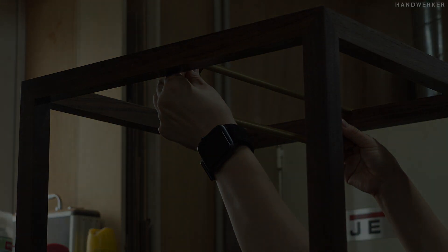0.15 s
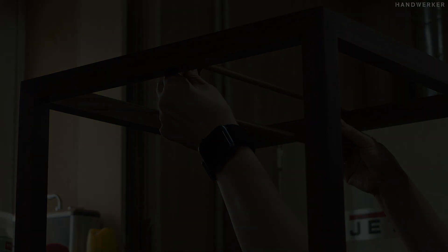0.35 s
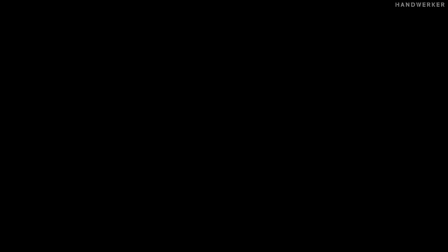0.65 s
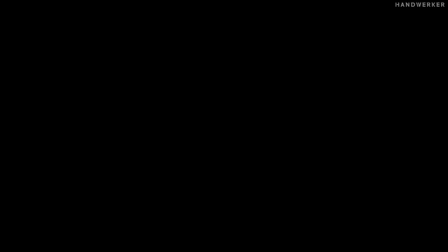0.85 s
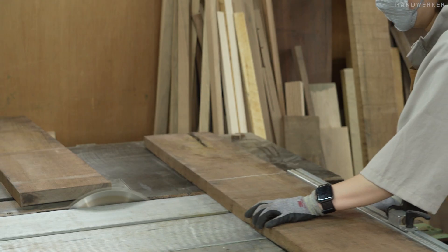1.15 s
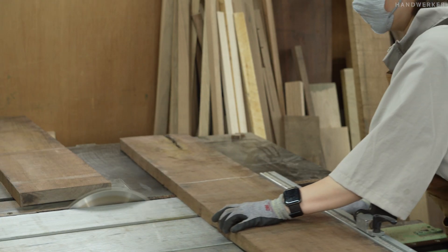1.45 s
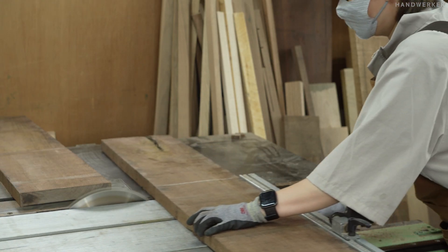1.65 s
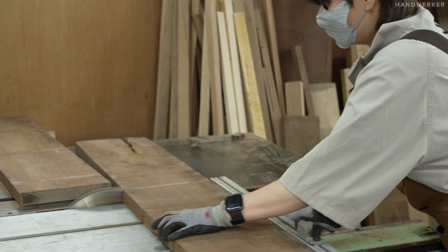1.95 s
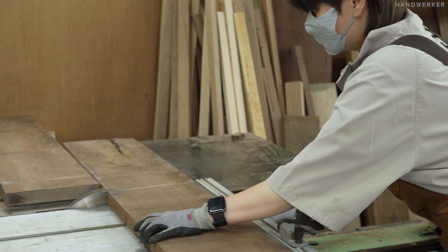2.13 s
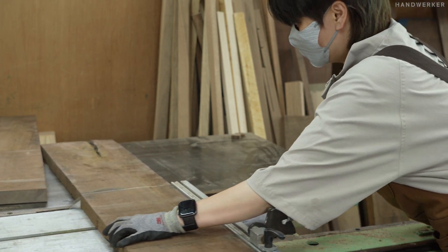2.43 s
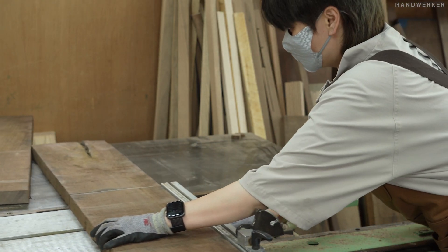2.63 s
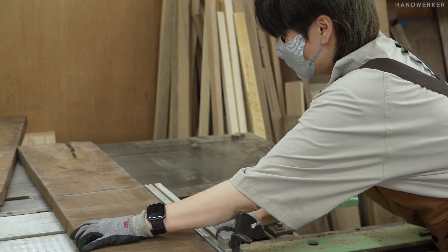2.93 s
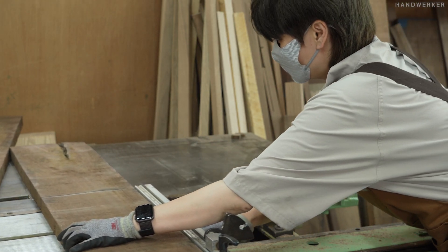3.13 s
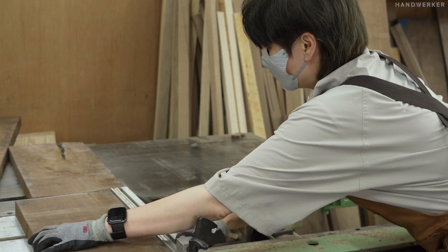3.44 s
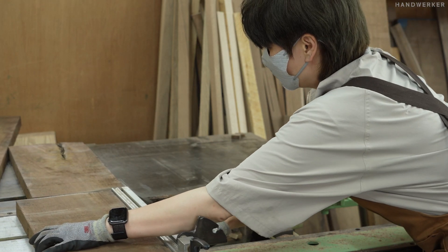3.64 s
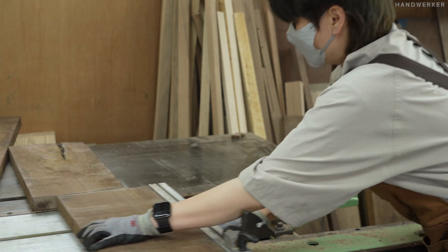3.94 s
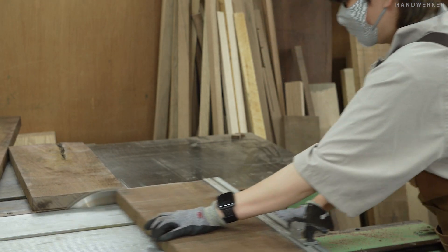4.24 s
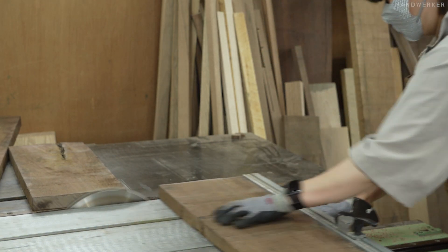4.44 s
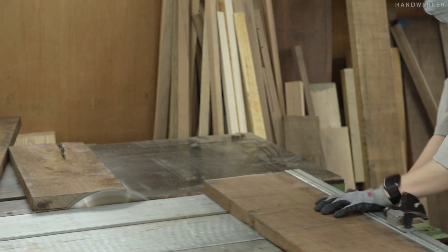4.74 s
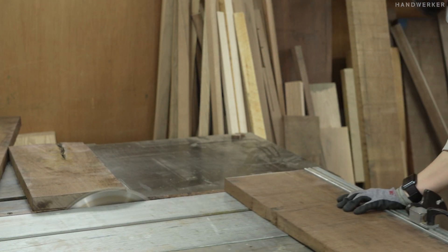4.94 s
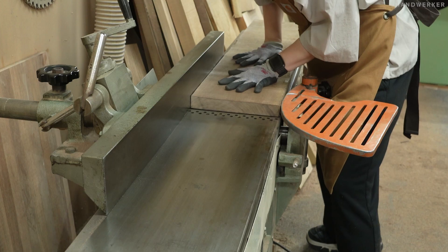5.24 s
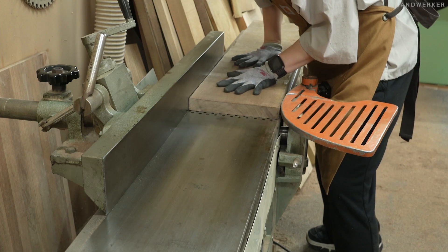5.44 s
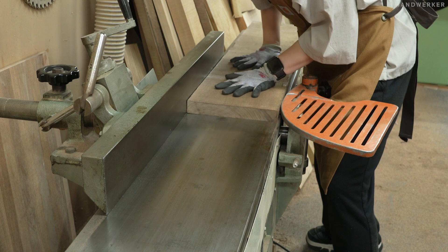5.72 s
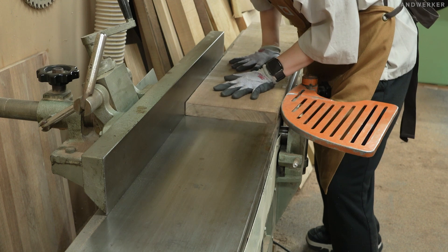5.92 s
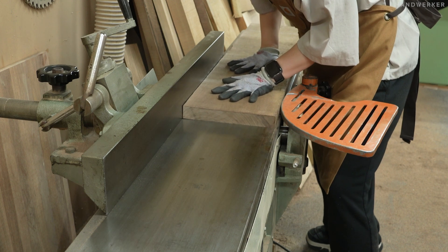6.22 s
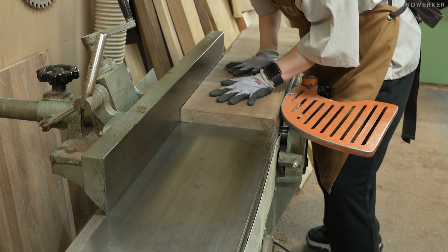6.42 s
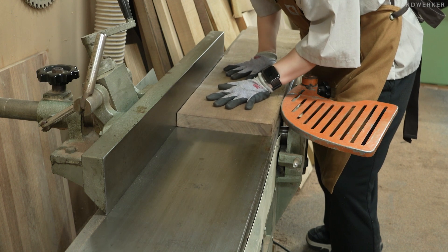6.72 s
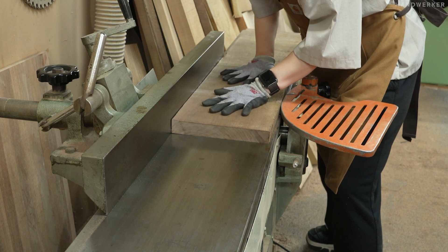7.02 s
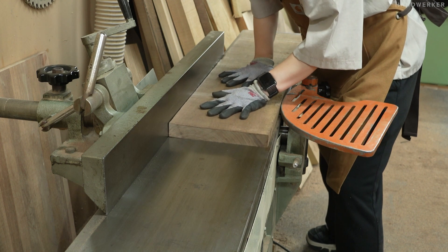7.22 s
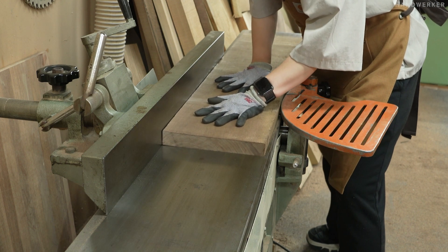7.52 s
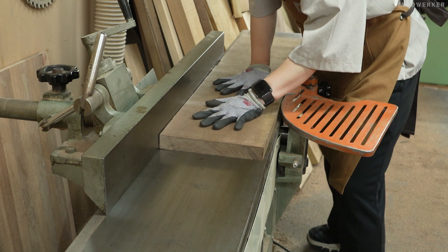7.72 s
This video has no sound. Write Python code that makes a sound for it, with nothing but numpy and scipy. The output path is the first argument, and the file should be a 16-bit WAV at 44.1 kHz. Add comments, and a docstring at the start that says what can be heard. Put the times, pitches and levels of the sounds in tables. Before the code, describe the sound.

A faint room hum with a soft wooden triple knock fades to silence, then a table saw hisses and squeals, then a jointer roars planing a board.

```python
"""A jointer planes a board in a wood shop: knives chop each turn, slot tones hoot and scream, board thuds.
Before it, a table saw hisses with noise and motor harmonics; its blade sings in two wavering tones.
First of all, a quiet room of hum and colored noise fades away from the start, with a soft triple knock
of decaying modes early on. The three moments follow in turn, in mono.
Chops are stroke waveforms that repeat per turn and slowly renew."""
import sys
import numpy as np
from scipy import signal
from scipy.fft import rfft, irfft, next_fast_len
from scipy.io import wavfile
from scipy.ndimage import uniform_filter1d, map_coordinates

SR = 44100
rng = np.random.default_rng(int(sys.argv[2]) if len(sys.argv) > 2 else 0)


def persist_wave(psi):
    """Save psi, clipped to +-1, as 16-bit WAV."""
    counts = np.round(np.clip(psi, -1, 1) * 32767).astype(np.int16)
    wavfile.write(sys.argv[1], SR, np.atleast_2d(counts).T)


N = 347067
TIME = np.arange(N) / SR
SAW_START_S, JOINTER_START_S = 1.107, 5.246


def from_db(db):
    """Decibels to gain."""
    return 10 ** (np.asarray(db) / 20)


def rms_one(x):
    """Scale to rms 1."""
    return x / np.sqrt(np.mean(x ** 2) + 1e-20)


def in_time(rows):
    """Interpolate each column of a time curve to every sample."""
    s, *columns = np.transpose(rows)
    return [np.interp(TIME, s, c) for c in columns]


def gain_at(spectrum, hz):
    """Gain of a spectrum, log-interpolated in f, falling 12 dB per octave past its ends."""
    f, db = np.transpose(spectrum)
    hz = np.maximum(hz, 1)
    low_cut = np.minimum(1, hz / f[0]) ** 2
    high_cut = np.minimum(1, f[-1] / hz) ** 2
    return from_db(np.interp(np.log(hz), np.log(f), db)) * low_cut * high_cut


def noise(spectrum):
    """Steady turbulence: white noise shaped by a spectrum, rms 1."""
    size = next_fast_len(N)
    white = rfft(rng.standard_normal(size))
    gain = gain_at(spectrum, np.fft.rfftfreq(size, 1 / SR))
    return rms_one(irfft(white * gain, size)[:N])


def drift(corner_hz):
    """Slow random wander, spread 1: noise through a double pole, run at SR / 40."""
    r = np.exp(-80 * np.pi * corner_hz / SR)
    white = rng.standard_normal(N // 40 + 2002)
    slow = signal.lfilter([1], [1, -2 * r, r * r], white)[2000:]   # settled part
    return np.interp(np.arange(N) / 40, np.arange(len(slow)), rms_one(slow))


def turns_of(hz):
    """Cycles completed at a steady or moving rate."""
    return np.cumsum(hz * np.ones(N)) / SR


def sine(turns):
    """Sine of rms 1 with a random start phase."""
    return np.sqrt(2) * np.sin(2 * np.pi * (turns + rng.random()))


def between(start_s, end_s, edge_s):
    """1 from start to end, with linear ramps inside."""
    return np.clip((TIME - start_s) / edge_s, 0, 1) * np.clip((end_s - TIME) / edge_s, 0, 1)


def swell(start_s, end_s):
    """Rounded rise and fall, at half height at start and end."""
    from_middle = np.abs((2 * TIME - start_s - end_s) / (end_s - start_s))
    return .5 ** np.minimum(from_middle ** 3, 40)


def cutting(turns, color, renew_per_s, patchy_db, evenness=0, skip=()):
    """A rotating cutter meets nearly the same fibers at each turn; the feed slowly brings new ones."""
    fibers = rng.standard_normal((int(TIME[-1] * renew_per_s) + 3, 512))
    orders = rfft(fibers)
    orders /= np.abs(orders) ** evenness
    # the grain favors clusters of neighboring harmonics
    clusters = rms_one(uniform_filter1d(rng.standard_normal(orders.shape), size=7))
    orders *= from_db(patchy_db * clusters)
    mean_hz = turns[-1] / TIME[-1]
    orders *= gain_at(color, np.arange(orders.shape[1]) * mean_hz)
    orders[:, list(skip)] = 0
    strokes = irfft(orders, 4096)
    strokes /= strokes.std(axis=1, keepdims=True)
    feed = TIME * renew_per_s + rng.random()
    place = [feed, turns % 1 * strokes.shape[1]]
    sound = map_coordinates(strokes, place, order=1, mode="grid-wrap")
    blend = feed % 1
    return sound / np.hypot(blend, 1 - blend)   # level held through the crossfade


# room noise color: [f/Hz, relative level/dB per Hz]
ROOM_COLOR = [(30, 2), (120, 10), (220, 0), (500, -5), (900, -9), (2500, -15.5), (5200, -16.5),
              (7000, -7.5), (12000, -2.5), (15500, -5.5)]
# slat bumping a wooden frame: [t/s, gain/dB]
KNOCKS = [(.053, -50), (.066, -52), (.081, -43)]
# frame modes: [f/Hz, relative level/dB, t60/s]
FRAME_MODES = [(287, -8, 0.22), (365, -10, 0.24), (390, -5, .22), (430, -1, 0.17), (550, -9, .1),
               (674, -11, 0.097), (1220, -20, .06)]
ROOM_HUM_HZ, HUM_DB, AIR_DB = 95, -55.5, -51.5   # levels before the fade
FADE_END_S, FADE_POWER = 0.59, 0.84


def quiet_room():
    """Hum and hiss fade away from the start; a slat bumps the frame and its modes ring briefly."""
    fade = np.clip(1 - TIME / FADE_END_S, 0, 1) ** FADE_POWER
    hum = from_db(HUM_DB) * sine(turns_of(ROOM_HUM_HZ))
    air = from_db(AIR_DB) * noise(ROOM_COLOR)
    room = fade * (hum + air)
    age_s = TIME[:SR // 2]
    ring = sum(from_db(db - 60 * age_s / t60_s) * np.sin(2 * np.pi * hz * age_s)
               for hz, db, t60_s in FRAME_MODES)
    for s, db in KNOCKS:
        room[int(s * SR):][:len(age_s)] += from_db(db) * ring
    return room


# teeth hiss before trim and flutter, sinking as the board covers the blade: [t/s, level/dB]
TEETH_LEVEL = [(1.15, -19), (1.75, -18), (2.1, -21.5), (2.32, -20.5), (2.72, -25.5), (3.88, -21),
               (3.91, -25.5), (4.43, -20.5), (5.2, -18.5)]


def teeth_level_db():
    """Course of the teeth's hiss in dB."""
    return in_time(TEETH_LEVEL)[0]


def cover_db():
    """How far the board covers the blade, as dB of the teeth's hiss that it takes away."""
    hiss_db = teeth_level_db()
    return hiss_db.max() - hiss_db


# air whirled by the teeth: [f/Hz, relative level/dB per Hz]
TEETH_COLOR = [(1800, -29), (2850, -25), (3050, -15), (3250, -2), (4150, 2), (4600, -4.5), (5200, -7.5),
               (6000, -13.5), (6900, -20.5), (9000, -26.5), (15500, -24.5)]
# brighter edge of bare teeth: [f/Hz, relative level/dB per Hz]
BARE_COLOR = [(4200, -13), (5400, 3), (6300, -5), (7500, -19.5)]
# cabinet and motor rumble: [f/Hz, relative level/dB per Hz]
RUMBLE_COLOR = [(25, -17), (55, -2), (85, 8.5), (130, 4), (220, 1.5), (480, -1), (750, -4.5), (1100, 0),
                (1500, -6), (2500, -11), (6000, -6)]
# teeth in the wood and flying dust: [f/Hz, relative level/dB per Hz]
RASP_COLOR = [(600, -2.5), (2000, -8.5), (3000, 8.5), (6000, 3.5), (8000, 3.5), (9500, 1), (11000, 1),
              (12600, 0), (13700, 0), (15800, -5)]
# motor harmonics: [multiple of shaft speed, relative level/dB]
MOTOR_ORDERS = [(1, -1.5), (2, -11.5), (6, -15.5)]
# motor hum before flutter: [t/s, level/dB]
MOTOR_LEVEL = [(1.15, -42.5), (2.1, -47), (2.68, -58), (3.55, -40), (5.2, -36)]
SAW_HZ = 80.87   # mean shaft speed
RUMBLE_DB = -35.5
BARE_DB, BARE_LOSS_PER_COVER = -29, 2.5     # free blade; dB lost per dB of cover
RASP_DB, RASP_PER_COVER = -31.5, 0.31       # free blade, before part levels; dB gained per dB of cover


def table_saw():
    """Teeth whirl the air, the motor hums, and the cut rasps in step with the shaft, more under cover."""
    turns = turns_of(SAW_HZ * (1 + .002 * drift(1.966)))
    motor_db = in_time(MOTOR_LEVEL)[0] + 0.84 * drift(7.5)
    hum = from_db(motor_db) * sum(from_db(db) * sine(k * turns) for k, db in MOTOR_ORDERS)
    rumble = from_db(RUMBLE_DB) * noise(RUMBLE_COLOR)
    hiss = from_db(teeth_level_db() + 0.13 + 0.72 * drift(26)) * noise(TEETH_COLOR)
    bare = from_db(BARE_DB - BARE_LOSS_PER_COVER * cover_db()) * noise(BARE_COLOR)
    dust = from_db(-4.5) * noise(RASP_COLOR)
    strokes = cutting(turns, RASP_COLOR, renew_per_s=12, patchy_db=3.5)
    bite = from_db(-0.5) * between(1.75, 4.5, edge_s=0.12) * strokes
    rasp = from_db(RASP_DB + RASP_PER_COVER * cover_db()) * (dust + bite)
    return hum + rumble + hiss + bare + rasp


# upper tone's pitch before flutter, sagging under load: [t/s, f/Hz]
BLADE_PITCH = [(1.82, 11995), (2.03, 11814), (2.68, 11801), (2.87, 11698), (3.28, 11950), (3.85, 11960),
               (4.05, 11846), (4.45, 11929)]
# kerf pinches, gains before flutter: [start/s, end/s, upper tone/dB, lower tone/dB]
PINCHES = [(1.8, 4.03, -38, -48), (1.98, 2.6, -26, -41), (2.36, 2.76, -40.5, -31.5),
           (2.738, 2.94, -29, -49.5), (3.002, 3.32, -29, -45), (3.75, 4.46, -45, -38),
           (4.12, 4.27, -41, -45), (4.32, 4.46, -35, -48)]
PINCH_RAMP_S = 0.045
SING_DB, SING_PER_COVER = -33, 0.13   # lower tone on the free blade; dB gained per dB of cover
FAINT_SQUEAL_DB = -47.5               # upper tone between pinches
BEAT_HZ, TWIN_SHARE = 7.6, 0.52       # twin mode: mean offset, strength relative to the lower tone


def singing_blade():
    """Rubbed by the kerf, the plate sings in two wavering tones an octave apart; pinches make it squeal."""
    pitch_hz, = in_time(BLADE_PITCH)
    turns = turns_of(pitch_hz * (1 + 0.00068 * drift(68)))
    squeal = from_db(FAINT_SQUEAL_DB)
    song = from_db(SING_DB + SING_PER_COVER * cover_db())
    for start_s, end_s, upper_db, lower_db in PINCHES:
        pinch = between(start_s, end_s, edge_s=PINCH_RAMP_S)
        squeal = squeal + from_db(upper_db) * pinch
        song = song + from_db(lower_db) * pinch
    upper = squeal * from_db(2.95 * drift(32)) * sine(turns)
    beat_turns = turns_of(BEAT_HZ * (1 + .45 * drift(4)))
    twins = sine(turns / 2) + TWIN_SHARE * sine(turns / 2 + beat_turns)
    lower = song * from_db(2.6 * drift(33)) * twins
    return (upper + lower) * between(1.78, JOINTER_START_S, edge_s=.03)


# plate rings and rasp bursts, before a 1 dB cut: [start/s, end/s, f/Hz, noise corner/Hz, level/dB]
RINGS_AND_BURSTS = [(2.15, 2.38, 2075, 20, -45), (2.51, 3.03, 2895, 50, -39), (2.6, 2.75, 10200, 400, -36),
                    (2.6, 2.85, 8500, 300, -36), (2.68, 3.0, 795, 8, -44), (2.68, 3.05, 14670, 80, -41),
                    (3.21, 3.35, 2295, 12, -42), (3.48, 3.68, 7950, 150, -39), (3.94, 4.16, 1730, 120, -42),
                    (3.95, 4.07, 2370, 70, -35), (4.05, 4.17, 2240, 70, -39)]


def rings_and_bursts():
    """Brief plate rings and rasp bursts of the cut, partly overlapping, swell and fade as narrow-band noise."""
    out = 0
    for start_s, end_s, hz, corner_hz, db in RINGS_AND_BURSTS:
        phase = 2 * np.pi * hz * TIME
        band = drift(corner_hz) * np.cos(phase) + drift(corner_hz) * np.sin(phase)
        out = out + from_db(db - 1.0) * swell(start_s, end_s) * band
    return out


ENTRY_S, ENTRY_LENGTH_S = 5.49, 1


def entering(at_end, in_cut):
    """Linear move from the value at the board's end to that in full cut as the end passes the knives."""
    return at_end + (in_cut - at_end) * np.clip((TIME - ENTRY_S) / ENTRY_LENGTH_S, 0, 1)


def swing(curve):
    """A level curve in dB about its mean during the planing."""
    db, = in_time(curve)
    return db - db[TIME > JOINTER_START_S].mean()


# lesser slot tones, before trim and flutter: [start/s, end/s, multiple of cutterhead speed, level/dB]
WHISTLES = [(5.1, 6.7, 3, -46), (5.1, 6.85, 9, -33), (5.15, 5.42, 15, -30), (5.35, 6.68, 24, -32),
            (5.46, 5.83, 30, -33), (5.6, 7.3, 15, -32), (5.65, 6.2, 5, -36), (5.65, 6.85, 18, -33),
            (5.66, 6.14, 35, -34), (5.68, 6.82, 12, -32), (5.68, 6.2, 8, -40), (5.69, 6.32, 51, -28),
            (5.93, 6.43, 47, -31), (6.25, 7.33, 21, -34), (6.4, 6.78, 57, -32), (6.5, 7.1, 81, -35),
            (6.95, 7.4, 15, -33), (7.01, 7.38, 52, -33), (7.02, 7.61, 30, -33), (7.11, 7.56, 42, -33),
            (7.3, 7.9, 18, -33), (7.4, 7.7, 12, -33), (7.41, 7.76, 39, -27), (7.6, 8.0, 9, -32),
            (7.6, 7.95, 21, -31)]


def whistle_gain(order):
    """Gain of the slot tone on one multiple of the cutterhead speed: the sum of its swells."""
    return sum(from_db(db) * swell(start_s, end_s) for start_s, end_s, k, db in WHISTLES if k == order)


# leading low slot tone, before trim: [t/s, level/dB]
HOOT = [(5.27, -29.5), (5.48, -21), (6.18, -35), (6.56, -72), (6.75, -43), (7.08, -38), (7.76, -34.5),
        (7.85, -36)]
# leading high slot tone, before trim: [t/s, level/dB]
SCREAM = [(5.27, -35), (5.38, -37), (5.47, -27.5), (6.23, -21.5), (6.68, -21.5), (7.17, -33), (7.39, -22),
          (7.6, -20), (7.85, -21.5)]
# faint floor of the lesser slot tones, before trim and flutter: [f/Hz, level/dB]
SLOT_FAINT = [(260, -61), (450, -47), (1500, -47), (3000, -44.5), (7000, -44.5)]
HOOT_ORDER, SCREAM_ORDER = 6, 27   # multiples of cutterhead speed


def slot_tones(turns):
    """Each knife pumps the air at the table lip like a siren; the moving board favors changing harmonics."""
    hoot = from_db(in_time(HOOT)[0] + 0.7) * sine(HOOT_ORDER * turns)
    scream = from_db(in_time(SCREAM)[0] + 0.4) * sine(SCREAM_ORDER * turns)
    lesser = 0
    for k in sorted({k for _, _, k, _ in WHISTLES}):
        faint = gain_at(SLOT_FAINT, k * SPEED[0][1]) * from_db(4.4 * drift(2.8))
        gain = np.hypot(whistle_gain(k), faint)
        lesser = lesser + gain * from_db(-1.1 + 0.99 * drift(19)) * sine(k * turns)
    pumping = 1 + 0.24 * np.cos(2 * np.pi * turns)   # the proudest knife pumps hardest
    return (hoot + scream + lesser) * pumping


# steady tones: [mean f/Hz, level/dB relative to the swells of the slot tone]
WHINE = [(769, -7), (802, -6), (1565, -8)]
WHINE_ORDER = 9   # slot tone that the whine follows


def whine():
    """Steady tones beside a low slot tone rise and fall with its swells, and beat against it."""
    tones = sum(from_db(db) * sine(turns_of(hz * (1 + 0.00212 * drift(10.3)))) for hz, db in WHINE)
    return whistle_gain(WHINE_ORDER) * tones


# board modes, before knife force: [start/s, end/s, f/Hz, level/dB]
BOARD_RINGS = [(5.27, 5.42, 7080, -27), (5.408, 5.575, 3404, -27), (5.43, 5.677, 5890, -30.5),
               (5.726, 6.403, 4327, -32)]


def board_rings(turns, speed_hz):
    """The proudest knife starts the ring of the board's end afresh at every turn."""
    age_s = turns % 1 / speed_hz
    return sum(from_db(db) * swell(start_s, end_s) * sine(hz * age_s)
               for start_s, end_s, hz, db in BOARD_RINGS)


# knives, set slightly unevenly: [position/turn, stroke strength/dB]
KNIVES = [(0, -5), (0.321, -6.5), (.62, -23)]
DRAG = (0.069, 0.41)   # steady force at the board's end, in full cut; a 0 dB stroke peaks at 1


def knife_force(turns, rise_turns, uneven_db):
    """Each knife strikes and its chip breaks away, unevenly, over a steady drag; running rms 1."""
    strikes = 0
    for at, db in KNIVES:
        age = ((turns - at) % 1) / rise_turns
        strikes = strikes + from_db(db) * (age * np.exp(1 - age)) ** 2
    force = entering(*DRAG) + strikes * from_db(uneven_db * drift(53))
    return force / np.sqrt(uniform_filter1d(force ** 2, size=4096))


# cutterhead speed before wander: [t/s, f/Hz]
SPEED = [(5.26, 86.74), (5.7, 86.57), (6.1, 86.56), (6.4, 86.45), (6.7, 86.25), (7.2, 86.05), (7.5, 85.68),
         (7.86, 85.68)]
# knife effort, used only as swing about its mean: [t/s, level/dB]
EFFORT = [(5.3, -37), (5.64, -40.5), (5.78, -29), (7.0, -38), (7.23, -36), (7.34, -40), (7.85, -35)]
# board thudding on the bed, before trim and flutter: [t/s, level/dB]
THUD_LEVEL = [(5.3, -51), (5.68, -45), (5.73, -38.5), (6.6, -39.5), (7.0, -46), (7.47, -42), (7.59, -47),
              (7.85, -46)]
# chop body: [f/Hz, relative level/dB per Hz]
BODY_COLOR = [(80, -17), (260, -9.5), (350, -10.5), (433, -3), (600, -6.5), (690, 7), (860, -4.5),
              (1200, 6.5), (1700, -0.5), (2000, 4.5), (2200, 0.5), (2480, 6), (2700, 0.5), (3000, -46)]
# knives' bite: [f/Hz, relative level/dB per Hz]
BITE_COLOR = [(2300, -15), (2700, 12.5), (3300, 3.5), (3550, 8.5), (4350, 3.5), (4950, 6), (5400, -30),
              (6200, -14)]
# splintering: [f/Hz, relative level/dB per Hz]
SPLINTER_COLOR = [(4600, -18), (5400, 6.5), (6000, -0.5), (6300, -0.5), (7000, 9), (7500, -2.5),
                  (9200, -0.5), (10500, -32)]
# chip spray: [f/Hz, relative level/dB per Hz]
SPRAY_COLOR = [(8400, -1.5), (9600, 1.5), (10800, 4), (12500, -0.5), (13100, 3), (14000, 1), (15800, -5)]
# board on bed: [f/Hz, relative level/dB per Hz]
THUD_COLOR = [(20, -22), (45, 2), (85, 6), (150, -2.5), (240, -2), (330, -16.5), (700, -12), (2000, -9.5)]
# rush of air: [f/Hz, relative level/dB per Hz]
RUSH_COLOR = [(150, -12), (450, 3), (650, 2.5), (790, 13), (950, 4), (2000, 0.5), (2400, 4.5), (4500, -1),
              (8000, -4), (15800, -27)]
BODY_DB = -30.5                                       # at mean effort
BITE_DB, BITE_PER_SCREAM = -28.5, 0.15                # at mean scream; dB per dB of scream
SPLINTER_DB, SPLINTER_PER_EFFORT = (-28.5, -31), 0.27   # board's end, full cut; dB per dB of effort
SPRAY_DB = (-34, -31)                                 # board's end, full cut


def jointer():
    """Knives chop the board at every turn, over slot tones, the rush of air and the board's thudding."""
    speed_hz, = in_time(SPEED)
    turns = turns_of(speed_hz * (1 + 0.00077 * drift(23)))
    effort_db, spray_db = swing(EFFORT), entering(*SPRAY_DB)
    # harmonics that belong to the slot
    slot_orders = [HOOT_ORDER, SCREAM_ORDER] + [k for _, _, k, _ in WHISTLES]
    body = from_db(BODY_DB + effort_db) * cutting(
        turns, BODY_COLOR, renew_per_s=2.2, evenness=0.36, patchy_db=4.0, skip=slot_orders)
    bite = from_db(BITE_DB + BITE_PER_SCREAM * swing(SCREAM)) * cutting(
        turns, BITE_COLOR, renew_per_s=2.6, patchy_db=2.5, skip=slot_orders)
    splinter_db = entering(*SPLINTER_DB) + SPLINTER_PER_EFFORT * effort_db
    splinter = from_db(splinter_db) * cutting(turns, SPLINTER_COLOR, renew_per_s=4.5, patchy_db=6.0)
    spray = from_db(spray_db) * cutting(turns, SPRAY_COLOR, renew_per_s=6.0, patchy_db=4.5)
    # loose chips differ from stroke to stroke
    chips = from_db(spray_db - 2.0) * noise(SPRAY_COLOR)
    air = from_db(-34.5) * noise(RUSH_COLOR)
    thud = from_db(in_time(THUD_LEVEL)[0] + 1.9 + 1.8 * drift(9.6)) * noise(THUD_COLOR)
    struck = bite + splinter + board_rings(turns, speed_hz)
    chop = knife_force(turns, rise_turns=0.042, uneven_db=1.5) * struck
    flying = knife_force(turns, rise_turns=0.091, uneven_db=1.7) * (spray + chips)
    return slot_tones(turns) + body + chop + flying + air + thud + whine()


def scene():
    """Room, saw and jointer in turn, alike in both channels."""
    saw = table_saw() + singing_blade() + rings_and_bursts()
    saw = saw * between(SAW_START_S, JOINTER_START_S, edge_s=0.00028)
    planing = jointer() * between(JOINTER_START_S, 9, edge_s=0.018)
    return np.tile(quiet_room() + saw + planing, (2, 1))


CUTOFF_HZ = 15900


def record(dry):
    """The tallest peaks are rounded and the top is cut steeply."""
    rounded = dry / (1 + (dry / .6) ** 6) ** (1 / 6)
    low_pass = signal.ellip(12, .1, 90, CUTOFF_HZ, fs=SR, output="sos")
    return signal.sosfilt(low_pass, rounded)


dry = scene()
out = record(dry)
persist_wave(out)
```